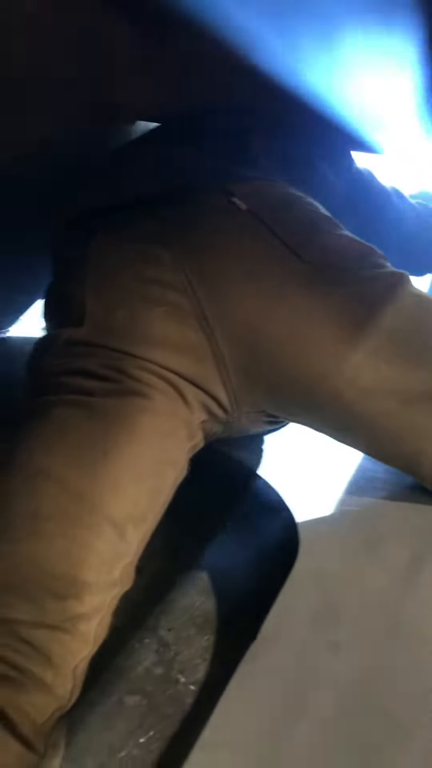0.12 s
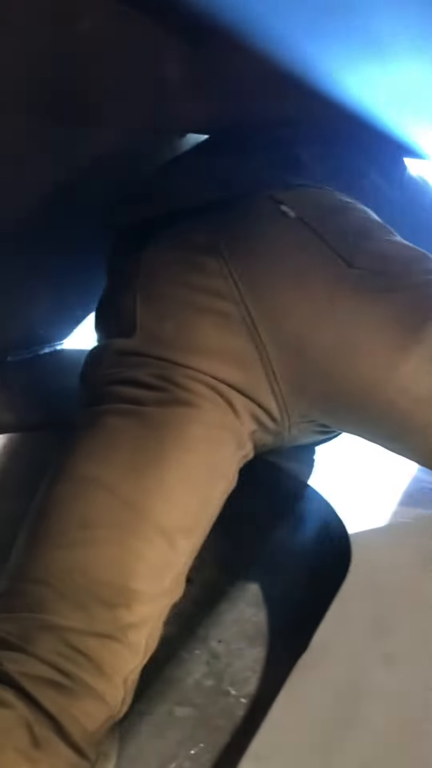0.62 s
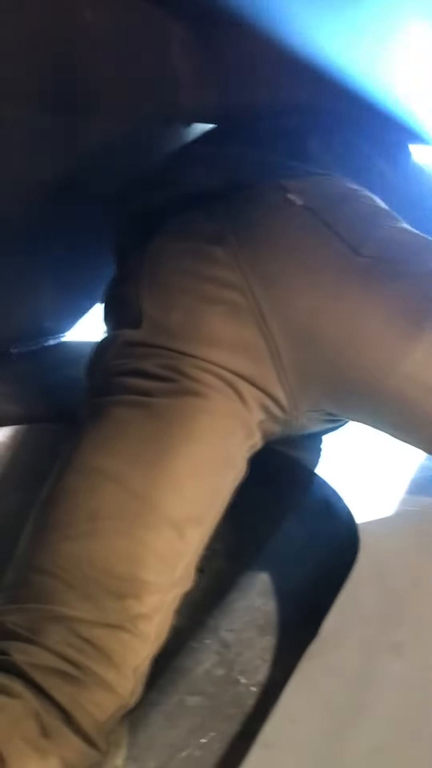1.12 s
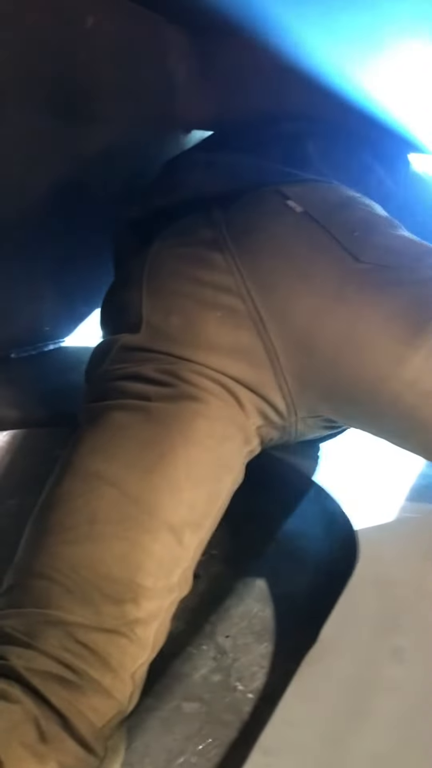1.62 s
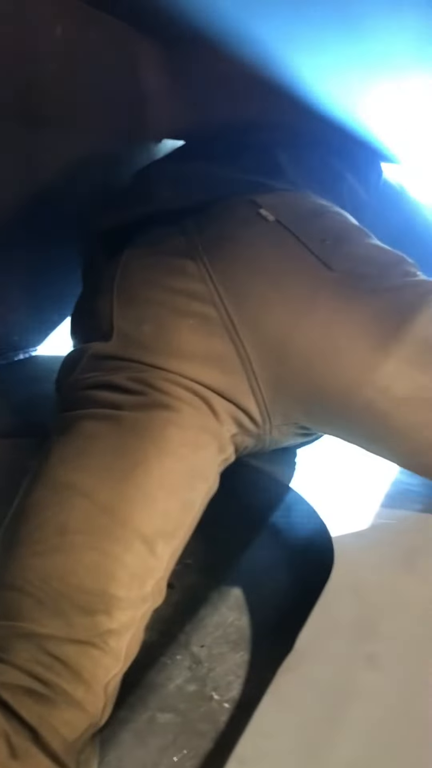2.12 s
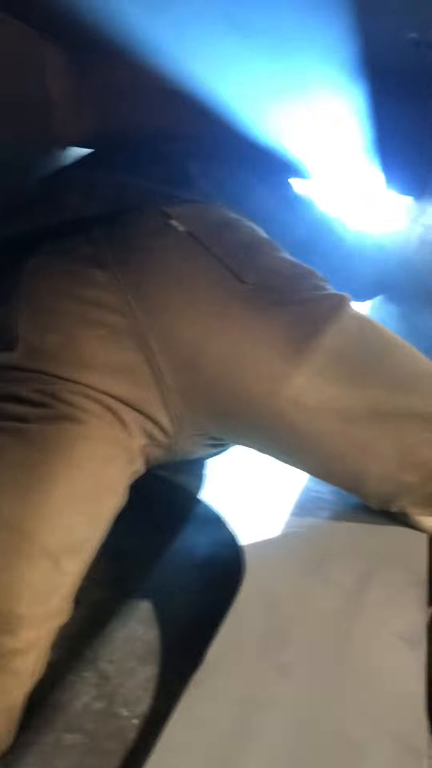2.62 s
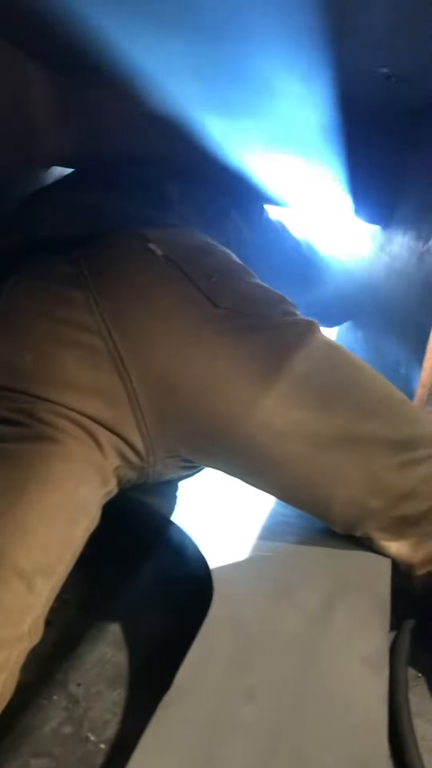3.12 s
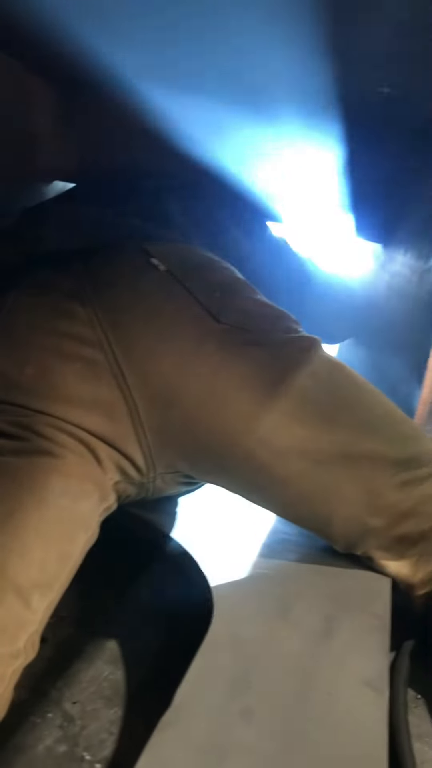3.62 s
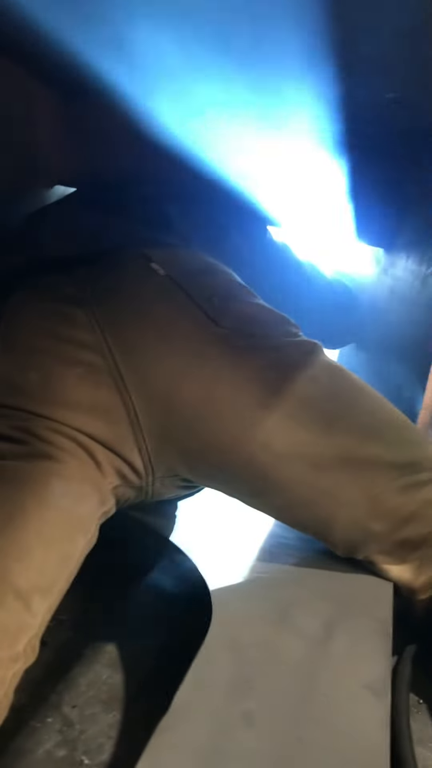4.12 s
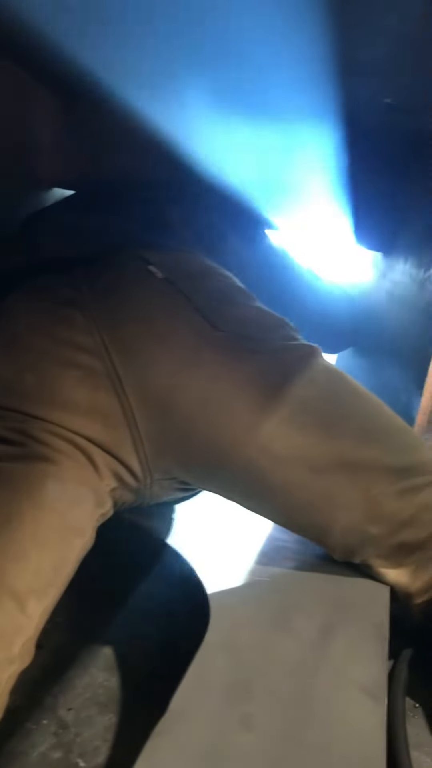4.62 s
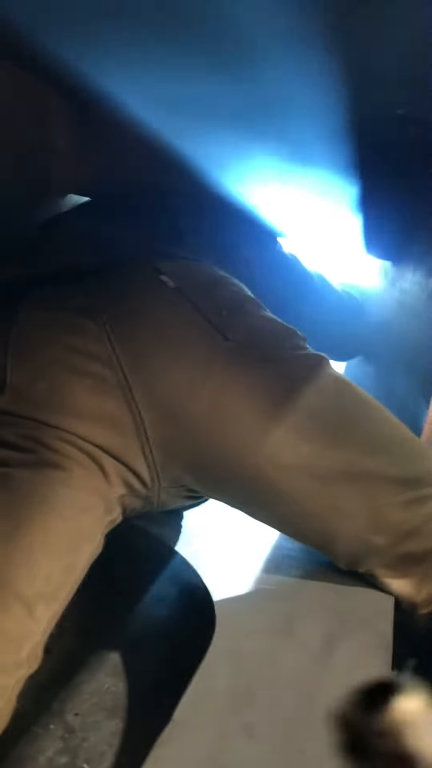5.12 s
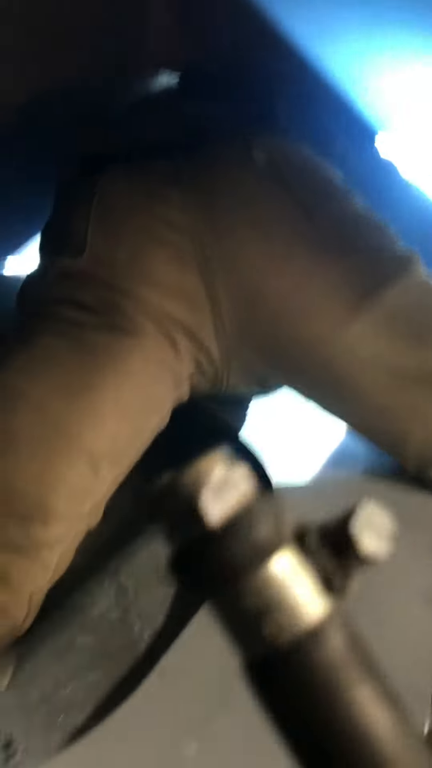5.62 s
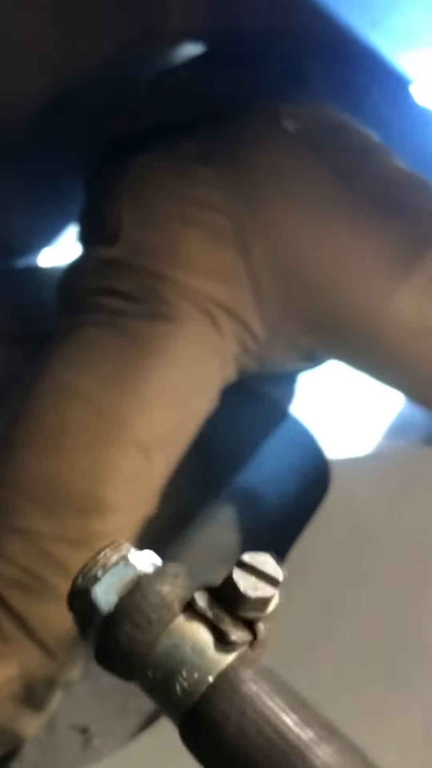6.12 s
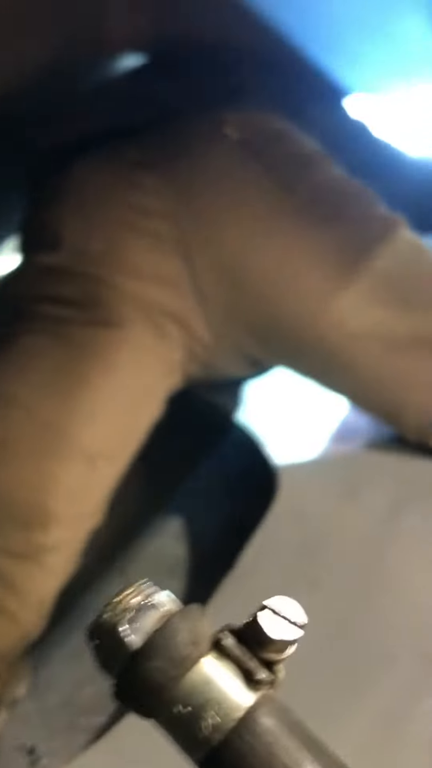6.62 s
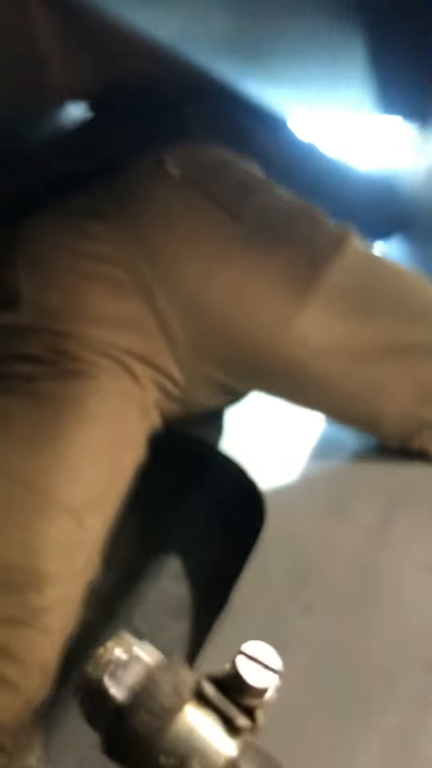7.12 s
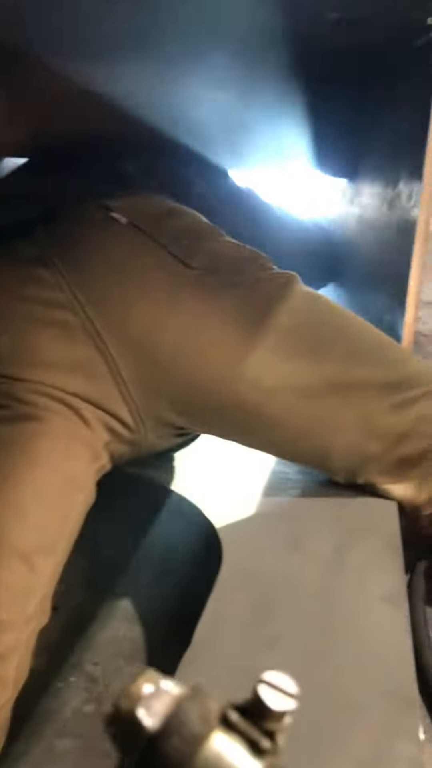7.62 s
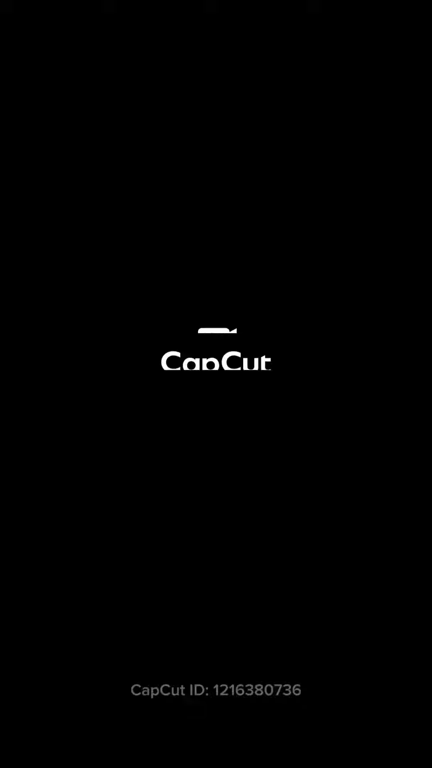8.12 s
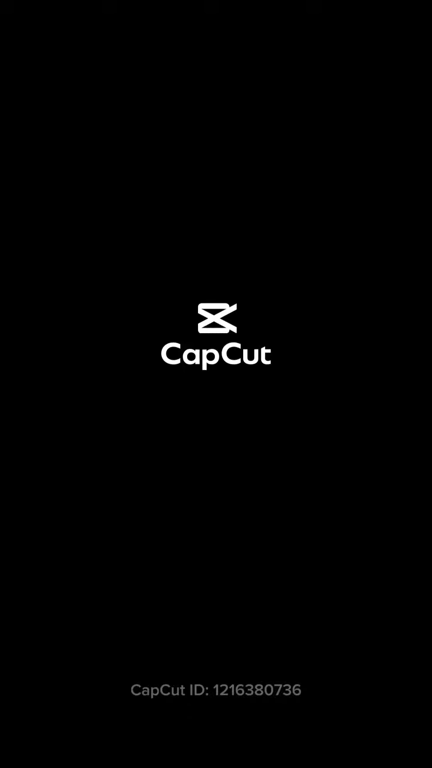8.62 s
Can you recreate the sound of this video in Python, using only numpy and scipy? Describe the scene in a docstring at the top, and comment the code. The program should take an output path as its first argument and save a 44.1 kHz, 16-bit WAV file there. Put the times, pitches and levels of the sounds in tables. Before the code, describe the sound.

From 0 s a welding arc and gas jet are already roaring loudly, close to a hand-held microphone in a cramped metal space. A low, uneven turbulent roar lies under a dense hiss and a bright, crisp sizzle, all roughened by rapid fine sputter. The level is squeezed and nearly constant. A thin, very high whistle is faintly present from about 0.8 to 2.6 s, weaker around 3.6 to 4.4 s, then clearer near 6.7 to 7.3 s and again from 7.6 s. Around 2.5 s the hiss lifts slightly, and it is fullest near 5.5 s before easing. Short wall echoes comb the treble into slowly sliding ridges, moving faster between 5.4 and 6.2 s. Small slices of treble momentarily spread wide. At 7.9 s it stops dead, with a minute fizz lasting a few hundredths of a second, then complete silence.

```python
"""A welding arc and its gas jet roar steadily in a cramped metal space, heard by one hand-held microphone.
Roar, hiss and sizzle are bands of one white noise that swell and flutter; the nozzle whistles faintly at times.
Short echoes from near walls comb the hiss into slowly shifting ridges, and the housing colours the treble.
Gain control squeezes the loud sound; slices of treble turn wide for an instant.
It stops dead, leaving a very brief faint fizz and then silence."""
import sys
import numpy as np
from scipy import signal
from scipy.io import wavfile

SR = 44100
rng = np.random.default_rng(int(sys.argv[2]) if len(sys.argv) > 2 else 0)


def waveform_to_disk(signal):
    """Save audio, clipped to [-1, 1], as 16-bit WAV at the path in sys.argv[1]."""
    frames = np.transpose(np.atleast_2d(signal))
    scaled = np.clip(frames, -1, 1) * 32767
    samples = np.round(scaled).astype(np.int16)
    wavfile.write(sys.argv[1], SR, samples)


def invert_db(level):
    """Linear amplitude ratio for a level in decibels (20 dB per decade), elementwise."""
    return 10 ** (np.asarray(level, dtype=float) / 20)


N = 386316
HOP = 256   # samples from one frame of noise to the next

# spectrum of the escaping gas, shared by hiss and sizzle: f/Hz, relative level/dB
GAS_SPECTRUM = [(900, -23), (1600, -1.5), (2500, -1.5), (4200, -3), (5500, -4), (7000, -5), (9000, -3.5),
                (11500, -3.5), (13300, -0.5), (14300, -5), (15200, -5.5), (16500, -8.5)]


def rms_one(x):
    """Scale to unit rms."""
    return x / np.sqrt(np.mean(np.abs(x) ** 2) + 1e-20)


def in_time(rows, t):
    """A curve of (time, value) points read at times t."""
    return np.interp(t, *np.transpose(rows))


def at_hz(points, hz):
    """Gains of a spectrum read on a log frequency axis, practically silent outside it."""
    point_hz, point_db = np.transpose(points)
    return invert_db(np.interp(np.log(hz + 1), np.log(point_hz), point_db, -90, -90))


def bell(hz, mid_hz, width_hz):
    """A resonance-shaped hump of height 1, width_hz wide at half height."""
    return 1 / (1 + (2 * (hz - mid_hz) / width_hz) ** 2)


def held(t, start, end, ease_s=.12):
    """Eases from 0 to 1 at the start and back at the end."""
    return .5 * (np.tanh((t - start) / ease_s) - np.tanh((t - end) / ease_s))


def drift(rate_hz, size):
    """Smoothed chance at the frame rate, slower for a lower rate_hz, unit rms."""
    r = np.exp(-2 * np.pi * rate_hz * HOP / SR)
    settle = 400   # frames dropped while the filter settles
    wander = signal.lfilter([1], [1, -2 * r, r * r], rng.standard_normal(size + settle))
    return rms_one(wander[settle:])


def roar(hz, t, swell_db):
    """Low turbulence in uneven gusts, sinking a little whenever the hiss swells."""
    # roar spectrum: f/Hz, relative level/dB
    roar_spectrum = [(15, -28), (28, -21), (50, 4.5), (75, -1), (150, -1), (350, -0.5), (460, -3.5),
                     (620, -2), (780, -2.5), (1150, -2), (1600, -6), (2200, -14.5), (3200, -21.5),
                     (5000, -53)]
    yield_share = 0.41   # dB the roar sinks per dB the hiss swells
    gusts_db = 0.38 * drift(2.5, len(t))
    return np.outer(rms_one(at_hz(roar_spectrum, hz)), invert_db(-14 - yield_share * swell_db + gusts_db))


def sizzle_share(hz):
    """Share of the gas noise power that belongs to the sizzle, rising around 6900 Hz."""
    return 1 / (1 + (6900 / (hz + 1)) ** 6)


def hiss(hz, swell_db, flutter):
    """Gas turbulence below the sizzle, swelling slowly and fluttering."""
    shape = at_hz(GAS_SPECTRUM, hz) * np.sqrt(1 - sizzle_share(hz))
    return np.outer(rms_one(shape), invert_db(-16 + swell_db + .6 * flutter))


def sizzle(hz, t, flutter):
    """The top of the gas turbulence, with its own slow swell and the flutter of the hiss."""
    # slow swell around the sizzle's set level: t/s, level/dB
    sizzle_swell = [(0, 0.7), (2.4, 0.5), (3.0, -0.5), (4.6, 0.5), (5.9, -1), (7.9, -0.1)]
    shape = at_hz(GAS_SPECTRUM, hz) * np.sqrt(sizzle_share(hz))
    return np.outer(rms_one(shape), invert_db(-18 + in_time(sizzle_swell, t) + 0.52 * flutter))


def whistle(hz, t):
    """The nozzle whistles in spells: narrow noise bands, 220 Hz wide, wavering in level."""
    # spells of whistle: start t/s, end t/s, centre f/Hz, level before wavering/dB
    spells = [(.75, 2.6, 13150, -29.5), (3.6, 4.4, 12900, -34), (6.7, 7.3, 13130, -26.5),
              (7.6, 8.2, 12900, -29)]
    waver_db = 1.5 * drift(3.0, len(t))
    total = 0
    for start, end, mid_hz, db in spells:
        level = invert_db(db + waver_db) * held(t, start, end)
        total = total + np.outer(rms_one(bell(hz, mid_hz, 220)), level)
    return total


def jet(hz, t):
    """Turbulent noise colour through time: roar, hiss, sizzle and whistle powers add."""
    # slow swell around the hiss's set level: t/s, level/dB
    hiss_swell = [(0, -0.5), (.4, -0.9), (2.1, -1.5), (2.5, 0.54), (4.8, 0.66), (5.5, 1.5), (6.3, 0.06),
                  (7.2, -0.9), (7.9, -1)]
    swell_db = in_time(hiss_swell, t)
    flutter = drift(21.0, len(t))   # the arc sputters a little, in hiss and sizzle together
    power = roar(hz, t, swell_db) ** 2 + hiss(hz, swell_db, flutter) ** 2
    return np.sqrt(power + sizzle(hz, t, flutter) ** 2 + whistle(hz, t) ** 2)


def walls(hz, t, count=36):
    """Direct sound plus echoes whose path lengths slide as the microphone moves."""
    # how far the hand has carried the microphone: t/s, distance/m
    hand = [(0, 0), (2.2, .014), (2.8, .040), (5.4, .066), (6.2, .150), (7.9, .205)]
    echo_db, echo_t60_s = -21, .12
    lag_draw, slant, size = rng.random((count, 3)).T
    lags = .0013 * 10 ** lag_draw   # 1.3 to 13 ms
    gains = invert_db(echo_db - 60 * lags / echo_t60_s) * (.5 + size)
    moved_s = in_time(hand, t) / 343   # distance as travel time of sound
    scatter = hz ** 2 / (hz ** 2 + 4700 ** 2)   # small surfaces throw back only short waves
    total = np.zeros((len(hz), len(t)), np.complex64)
    for lag, cosine, gain in zip(lags, 2 * slant - 1, gains):
        turn = (2 * np.pi * np.outer(hz, lag + cosine * moved_s)).astype(np.float32)
        total += gain * (np.cos(turn) - 1j * np.sin(turn))
    usual_gain = np.sqrt(1 + np.sum(gains ** 2) * scatter[:, None] ** 2)
    return (1 + scatter[:, None] * total) / usual_gain


def ridges(hz, t):
    """Broad treble ridges and a dip that fade in, hold and fade out."""
    # ridges in the treble: start t/s, end t/s, centre f/Hz, width f/Hz, level/dB
    ridge_spells = [(-.5, 2.7, 6900, 400, 2.5), (-.5, 2.7, 8700, 250, 2), (-.5, 1.8, 11400, 250, 1.5),
                    (1.0, 2.8, 14300, 250, 3.5), (3.2, 5.2, 11800, 500, 2), (5.6, 6.3, 12500, 1500, -1),
                    (6.2, 10.2, 9400, 350, 2)]
    total_db = 0
    for start, end, mid_hz, width_hz, db in ridge_spells:
        total_db = total_db + np.outer(db * bell(hz, mid_hz, width_hz), held(t, start, end))
    return invert_db(total_db)


def housing(hz):
    """The microphone housing puts fixed dips and humps in the treble."""
    # dips and humps: centre f/Hz, width f/Hz, level/dB
    humps = [(4910, 260, -4), (7770, 310, -3), (8700, 420, 1), (9960, 300, 2), (10470, 410, -5),
             (11570, 500, 1.5), (12200, 500, -0.5)]
    return invert_db(sum(db * bell(hz, mid_hz, width_hz) for mid_hz, width_hz, db in humps))


def sputter(x, from_hz=1300.0, rate_hz=90.0, depth_db=.9):
    """The unsteady arc roughens the hiss with quick random level changes."""
    high = signal.sosfiltfilt(signal.butter(2, from_hz, "high", fs=SR, output="sos"), x)
    slow_pass = signal.butter(1, rate_hz, fs=SR, output="sos")
    quick = rms_one(signal.sosfilt(slow_pass, rng.standard_normal(N)))
    return x + high * (invert_db(depth_db * quick) - 1)


def gain_control(x, window_s=0.013, share=0.16, aim_db=-12.0):
    """Moments above the aim are turned down, those below turned up, by a share of the difference."""
    r = np.exp(-1 / (window_s * SR))
    at_aim = np.full((len(x), 1), r * invert_db(2 * aim_db))   # the follower starts at the aim
    power = signal.lfilter([1 - r], [1, -r], x ** 2, zi=at_aim)[0]
    level_db = 10 * np.log10(power + 1e-12)
    return x * invert_db(-share * (level_db - aim_db))


def treble_spread(mid):
    """Now and then a slice of treble turns wide: a side signal of short band-limited bursts."""
    spreads_per_s, spread_db = 4.0, -3.5
    size, overlap = 4 * HOP, 2 * HOP
    hz, t, frames = signal.stft(mid, SR, nperseg=size, noverlap=overlap)
    chance, low, width = rng.random((len(t), 3)).T
    low_hz = 4200 * 3.4 ** low
    high_hz = low_hz + 1200 + 900 * width
    inside = (hz[:, None] > low_hz) & (hz[:, None] < high_hz)
    burst = inside * (chance < spreads_per_s * 2 * HOP / SR)
    burst = np.maximum(burst, np.roll(burst, 1, axis=1))   # each lasts two frames
    scrambled = frames * burst * np.exp(2j * np.pi * rng.random(frames.shape))
    return invert_db(spread_db) * signal.istft(scrambled, SR, nperseg=size, noverlap=overlap)[1][:N]


def stop_dead(x):
    """The sound drops at once to a faint, fast-decaying fizz, then to silence."""
    stop_s, fizz_db, fizz_t60_s, fizz_s = 7.904, -21, 0.024, .036
    after_s = np.arange(N) / SR - stop_s
    fizz = invert_db(fizz_db - 60 * after_s.clip(0) / fizz_t60_s) * (after_s < fizz_s)
    return x * np.where(after_s < 0, 1, fizz)


def scene():
    """White turbulence coloured frame by frame by jet, walls, ridges and housing, alike in both channels."""
    size, overlap = 8 * HOP, 7 * HOP
    hz, t, frames = signal.stft(rng.standard_normal(N), SR, nperseg=size, noverlap=overlap)
    echoes = np.repeat(walls(hz, t[::4]), 4, axis=1)[:, :len(t)]   # renewed every fourth frame
    heard = frames * jet(hz, t) * echoes * ridges(hz, t) * housing(hz)[:, None]
    sound = signal.istft(heard, SR, nperseg=size, noverlap=overlap)[1][:N]
    return np.array([sputter(sound)] * 2)


def band_limit(x):
    """A steep low-pass at the top of the band."""
    return signal.sosfilt(signal.butter(12, 17040, fs=SR, output="sos"), x)


def record(dry):
    """Deep bass is cut, level evened, peaks rounded, the top filtered away, treble spread, then the stop."""
    top = 0.91   # ceiling of the rounded peaks
    bassless = signal.sosfilt(signal.butter(2, 42.0, "high", fs=SR, output="sos"), dry)
    squeezed = top * np.tanh(gain_control(bassless) * invert_db(-0.21) / top)
    dulled = signal.sosfilt(signal.ellip(16, .3, 80, 15740, fs=SR, output="sos"), squeezed)
    wide = dulled + treble_spread(dulled[0]) * [[1], [-1]]   # opposite sign left and right
    return band_limit(stop_dead(wide))


dry = scene()
out = record(dry)
waveform_to_disk(out)
```